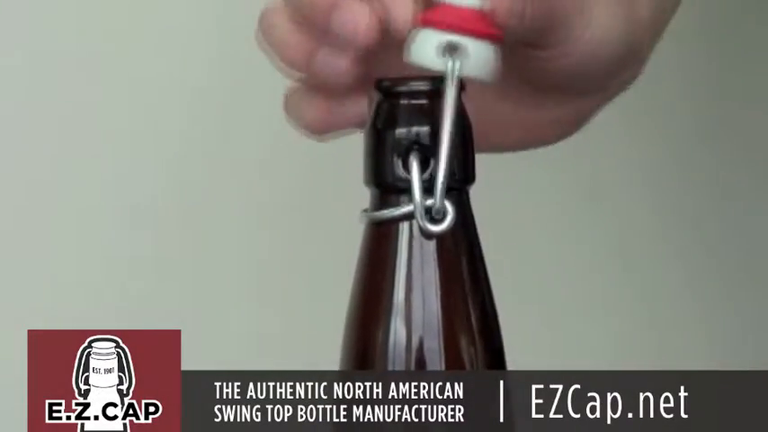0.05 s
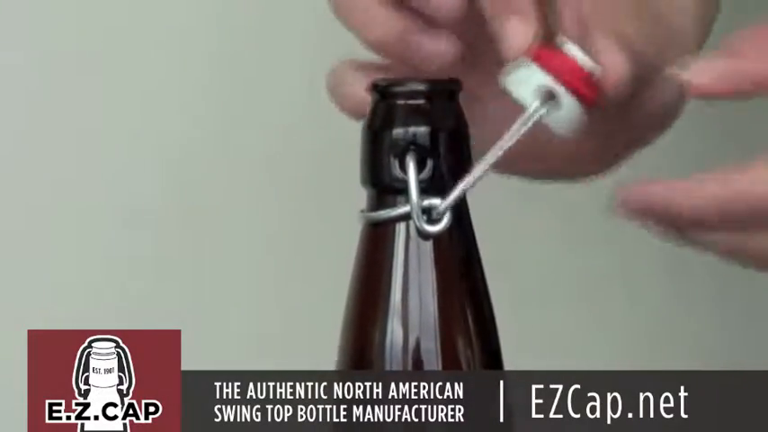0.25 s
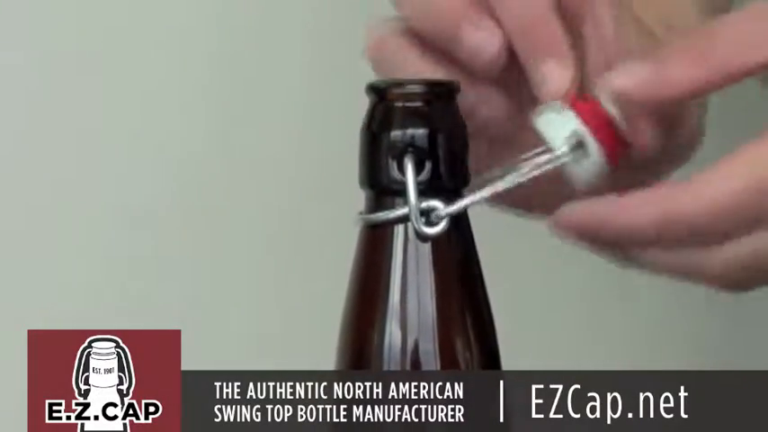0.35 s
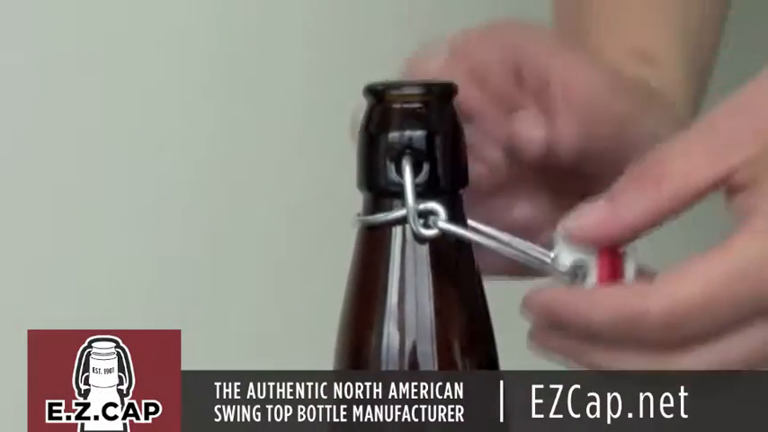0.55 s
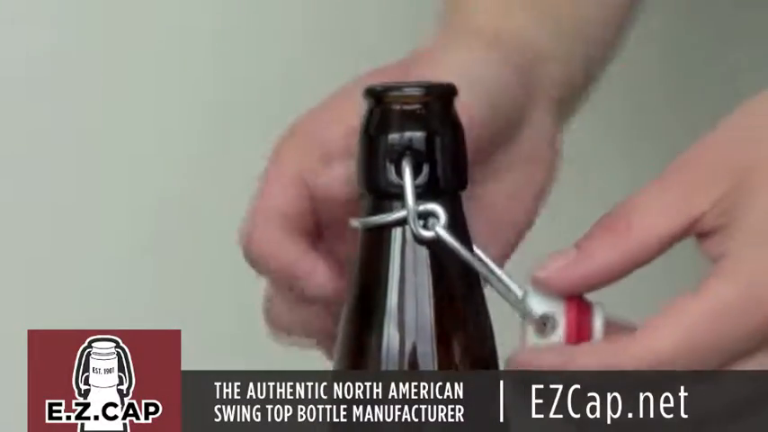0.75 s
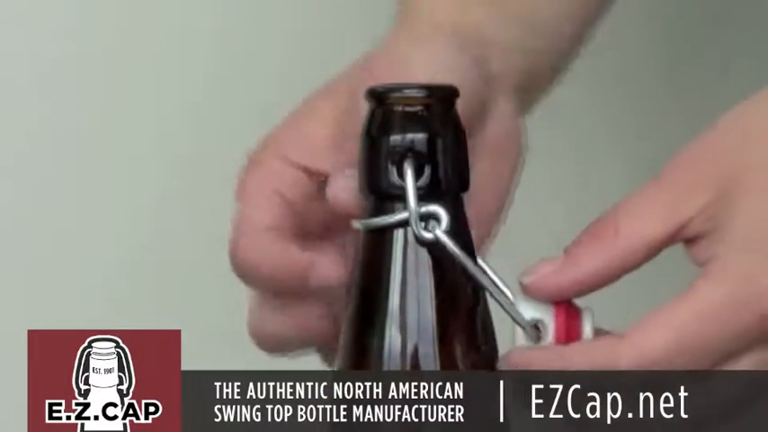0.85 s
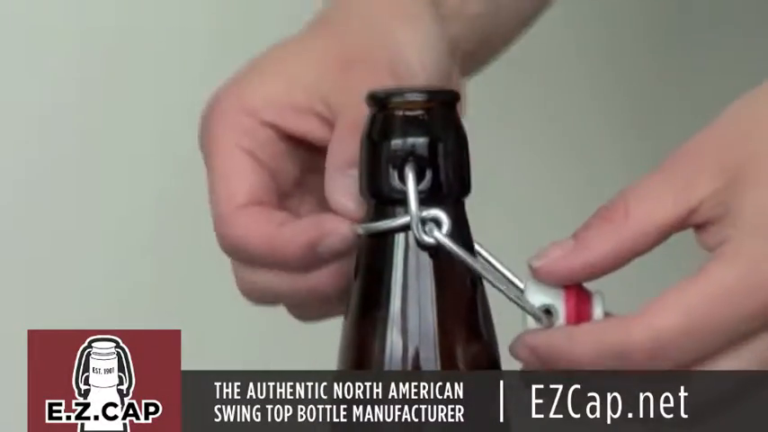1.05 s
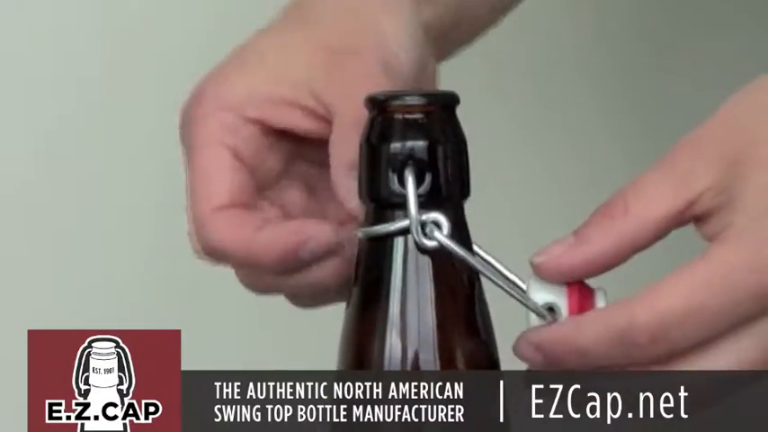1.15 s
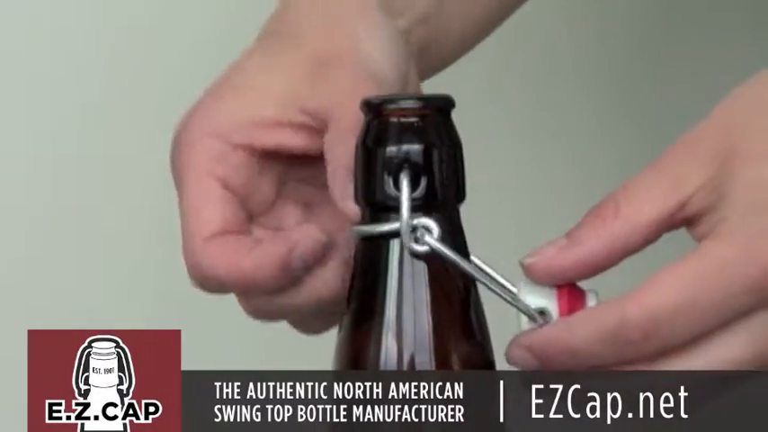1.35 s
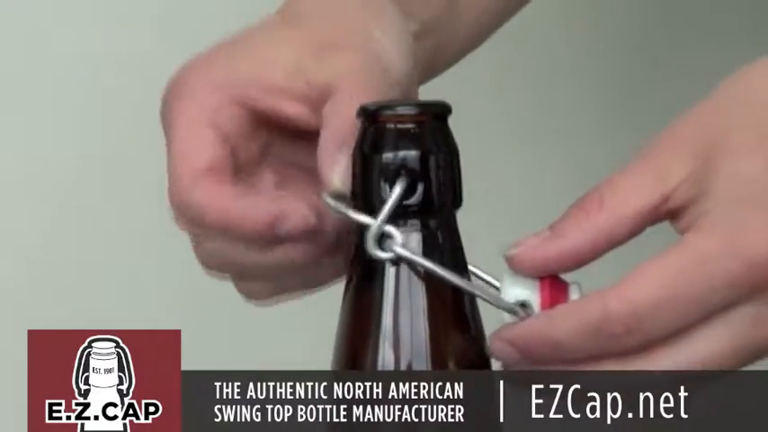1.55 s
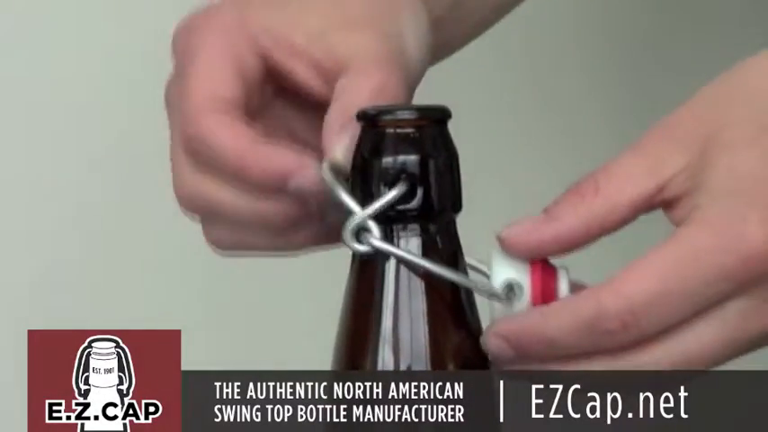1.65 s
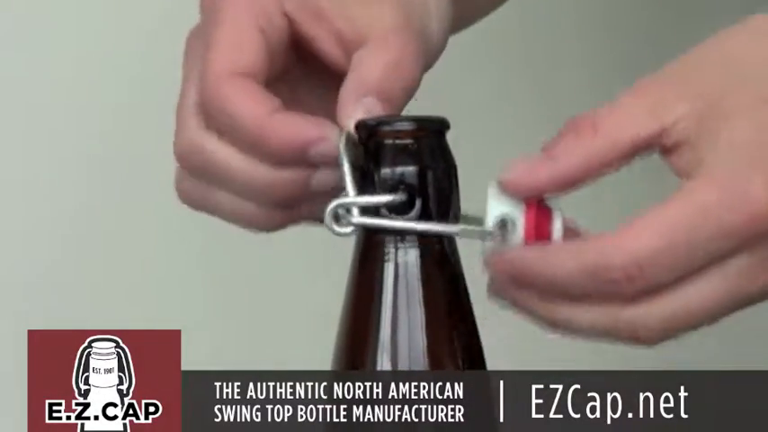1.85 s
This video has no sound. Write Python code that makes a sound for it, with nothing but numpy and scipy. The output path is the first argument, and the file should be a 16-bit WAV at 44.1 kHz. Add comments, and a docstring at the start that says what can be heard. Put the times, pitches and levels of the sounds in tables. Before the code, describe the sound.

A wire clasp clinks against a glass bottle, close by, at the start and at 0.2 seconds. The loudest cluster of bright, briefly ringing clinks comes around 0.5 seconds, with loose wire jiggling until 0.8. Softer ticks follow from 1.0 to 1.2 seconds. Around 1.6 the lever ticks and scrapes briefly, fading by 1.8. A low rumble and faint electrical whine fill the small room throughout.

```python
"""Opening a bottle's wire clasp

Hands swing open the wire clasp and stopper of a glass bottle, close by in a small room with a low
rumble and a thin electrical whine. Each clink is a short chatter of contacts that excites the damped
modes of wire and glass. Between clinks the loose wire jiggles; at the end the lever scrapes in its seat."""
import sys
import numpy as np
from scipy import signal
from scipy.fft import rfft, irfft
from scipy.io import wavfile

SR = 44100
rng = np.random.default_rng(int(sys.argv[2]) if len(sys.argv) > 2 else 0)


def to_wav(sig):
    """Store sig (one row per channel, or 1-D mono) as 16-bit WAV at the path in sys.argv[1].

    Samples outside -1..1 are clipped; the rate is SR.
    """
    pcm = np.clip(np.atleast_2d(sig), -1, 1) * 32767
    pcm = np.round(pcm).astype(np.int16)
    wavfile.write(sys.argv[1], SR, pcm.T)  # frames by channels


N = 83790

# Spectra of background noise, contact crack and lever friction: frequency_hz, relative_db
RUMBLE_SPECTRUM = [(20, -29), (32, 2), (44, 0), (70, -4.5), (120, -4), (160, -7.5), (220, -5), (290, -6.5),
                   (400, -14.5), (700, -17), (1000, -24), (1700, -29.5), (4000, -32), (9000, -36),
                   (14000, -36), (16500, -55)]
CRACK_SPECTRUM = [(300, -10), (1000, -8), (1800, -22), (3300, -16), (6300, -14.5), (9500, -0.5),
                  (11500, -1), (13000, -7), (16000, -24)]
SCRAPE_SPECTRUM = [(500, -13), (1500, -7), (2600, -4), (3500, -2.5), (4500, 1), (6500, -1), (7800, 0),
                   (9500, -3), (11000, -18), (14000, -24)]
# Stereo width of background noise and reverberation, narrow in the bass and highest treble:
# frequency_hz, side_to_mid_db
SIDE_SPECTRUM = [(30, -40), (90, -31), (180, -20), (350, -11), (700, -3.5), (1400, 2.5), (4000, -2.5),
                 (8000, -3.5), (12000, -25)]
# Steady tones: pitch_hz, level_db
HUM_TONES = [(43.3, -58.5), (183, -60.5), (217, -62.5), (275, -60.5), (15734, -64)]
# Modes of clasp and bottle: pitch_hz, level_db, t60_s, family (rounded to 0-7)
BOTTLE_MODES = [(2375, -8, .04, 1), (2747, -3, 0.046, 1), (2960, -4, 0.27, 1), (3340, -15, 0.082, 1.5),
                (3483, -14.5, 0.12, 0), (3536, -11, 0.16, 1.5), (3674, -5, 0.074, 2.5),
                (4630, -21.5, 0.11, 2), (4820, -20, 0.18, 3), (5835, -1.5, 0.17, 3), (7630, -21, 0.11, 0),
                (7940, -1.5, .17, 4), (8154, -19, 0.072, 2.5), (8260, -1.5, .11, 0), (8317, -7, .11, 0),
                (8927, -1, 0.097, 5), (8940, -21, .04, 4), (9935, -14, 0.13, -0.5), (10854, 0, 0.097, 6),
                (10750, -16, .03, 6), (11340, -12, 0.066, 6), (11900, -25, 0.15, 6), (12470, 0, 0.052, 7)]
# Impacts: start_s, level_db, chatter_s, t60_ratio, crack_db, then family_db for families 1-7
# (near 3, 3.5, 5.8, 7.9, 8.9, 10.9, 12.5 kHz), set by the place of contact against family 0 (8.3 kHz)
CLINK_EVENTS = [ (.003, -37, 0.006, 0.52, -10.5, -21, -16, -39, -13, -22, -17, -40),
                (.2332, -37, .001, 0.33, 4.5, -17, -14, 1, -10, -8, 2, -18),
                (0.2361, -33, 0.0065, 0.68, -4, -11.5, -33, -4, -13, -13, -5, -22),
                (.4378, -36.5, 0.0027, 0.68, -11, -9.5, -6.5, -10, -7, -1.5, 4.5, -1),
                (.5238, -37, 0.0022, .8, 4, -11, -13, -13, -5, -18, 7, 11),
                (.5295, -25, 0.0034, 0.61, -9, -28, -1, -24, -8.5, -6, 1, -10),
                (.543, -28, 0.0073, 0.56, -8.5, -22, -17, -25, -8, -17, 2, -20),
                (.5495, -30.5, 0.0015, 0.35, -5, -14, -18, -36, -1, -17, 5.5, -26),
                (.607, -41.5, .004, 0.59, -16, -12, -1, -34, -0.5, -14, -21, -25),
                (.624, -41.5, 0.0064, 0.9, 0, -8, 5.5, -22, -15, 2, -13, -24),
                (.631, -39, 0.0042, 0.88, -5, -6.5, 1, -14, -9.5, 1, -5, -24),
                (.647, -49, .004, 1.64, -15, -2, 11.5, -6.5, -3, 2, 12.5, -13),
                (.659, -47, 0.004, 1.1, -16, -6, 9, -20, -6, -2, 6, -15),
                (.673, -37, 0.015, 0.41, -17, -7, 2.5, -24, -16, -12, -7, -20),
                (0.7512, -35.5, 0.0028, 0.83, -5.5, -15, 1, -24, 3.5, -5, 2, -17),
                (.9695, -51, 0.0011, 0.43, 0, -1.5, 6, -12, -7, -1, 8.5, -8),
                (.9795, -44.5, .003, 0.68, 1.5, -15, 0.5, -20, -18, 4, 3, -17),
                (.9875, -45.5, 0.0016, 0.73, -9, -11, 0.5, -11, -14, 7, -2, -2),
                (1.0457, -52, 0.0019, 0.72, -1, 1, 3, -12, 0, -3, 6.5, -9),
                (1.063, -48, 0.0024, 0.6, 2.5, -5, -21, -7.5, -3, -10, 5.5, -4),
                (1.191, -50, .002, 0.68, -6, -9, -1, -12, -9, -7, -2.5, -16),
                (1.222, -62.5, .005, 0.65, 2, 7, 6, 3, -4, 1, -4, -6),
                (1.5925, -50, 0.0018, 0.82, 0, -6, 6.5, -9, 0, 4, 13.5, -3),
                (1.689, -60, .002, 0.54, -9, -2.5, -11, -12, -5, -8, -4, -4),
                (1.7055, -54, .002, 0.46, -5, -5, -12, -9, -7, -11, -1, -6),
                (1.736, -61.5, 0.0026, 0.49, 2, -4, 2, -8, -5, -1, -1, -3.5)]
# Bursts of rattling: start_s, length_s, level_db, ping_db (family 3)
JIGGLE_EVENTS = [(.01, .04, -55.5, -12), (0.13, .03, -58, 2.5), (0.224, 0.0092, -50.5, -11),
                 (.28, .035, -57.5, 4.5), (.355, .035, -55.5, -2.5), (.485, .02, -55.5, -12),
                 (0.514, .008, -47.5, -12), (.57, .04, -47, -10), (.68, .025, -51.5, -6),
                 (0.788, .05, -55.5, -6)]
# Lever strokes: start_s, level_db, t60_s
SCRAPE_STROKES = [(1.6359, -43.5, 0.22), (1.684, -57.5, 0.073), (1.704, -54, 0.12), (1.734, -55, 0.22)]
# Weights of families 0-7 under light contact: level_db
LIGHT_TOUCH_DB = [-4, -5, 4.5, -8, -7.5, -11, -5, -16]

EVENT_TIME_S = np.arange(SR // 2) / SR
LEFT_RIGHT = np.array([[1], [-1]])


def gain(db):
    """Amplitude ratio of a level in decibels."""
    return 10 ** (np.asarray(db) / 20)


def unit_rms(x):
    """Normalisation to an rms of 1."""
    return x / (np.sqrt(np.mean(x ** 2)) + 1e-12)


def decay(t, t60_s):
    """Exponential damping: 60 dB in t60_s."""
    return np.exp(-np.log(1000) * t / max(t60_s, 1e-3))


def add(out, start_s, x):
    """Superposition of x on out from start_s."""
    i = int(start_s * SR)
    x = x[:max(len(out) - i, 0)]
    out[i:i + len(x)] += x


def colour(x, spectrum):
    """Spectral shaping by a curve interpolated in log frequency."""
    hz, db = np.array(spectrum).T
    bins_hz = np.maximum(np.fft.rfftfreq(len(x), 1 / SR), 1)
    curve_db = np.interp(np.log(bins_hz), np.log(hz), db)
    return irfft(rfft(x) * gain(curve_db), len(x))


def rumble(level_db=-46.5):
    """Broadband room noise, strongest in the bass; an uncorrelated side signal gives it width."""
    mid, side = (unit_rms(colour(rng.standard_normal(N), RUMBLE_SPECTRUM)) for _ in range(2))
    return gain(level_db) * (mid + LEFT_RIGHT * colour(side, SIDE_SPECTRUM))


def hum():
    """Steady sinusoids superpose as a low hum and a thin electrical whine."""
    t = np.arange(N) / SR
    return sum(gain(db) * np.sqrt(2) * np.sin(2 * np.pi * (hz * t + rng.random()))
               for hz, db in HUM_TONES)


def contacts(t, per_s):
    """A Poisson process of tiny impacts of random strength."""
    return (rng.random(len(t)) < per_s / SR) * rng.standard_normal(len(t))


def ring(force, family_db, t60_ratio=1, bloom_s=.0011, detune=.0005):
    """Modal resonance: each mode swells and decays; the fingers alter its damping and pitch."""
    out = np.zeros(len(force))
    bloom = np.exp(-1 / (bloom_s * SR))
    shifts = rng.standard_normal(len(BOTTLE_MODES))
    for (hz, db, t60_s, family), shift in zip(BOTTLE_MODES, shifts):
        radius = decay(1 / SR, t60_s * t60_ratio)
        angle = 2 * np.pi * hz * (1 + detune * shift) / SR
        ring_poles, bloom_poles = ([1, -2 * r * np.cos(angle), r * r] for r in (radius, bloom))
        mode = signal.lfilter([1], np.convolve(ring_poles, bloom_poles), force)
        mode /= np.sqrt(mode @ mode * (1 - radius ** 2) + 1e-18)  # energy of a decay from rms 1
        out += gain(db + family_db[round(family)]) * mode
    return out


def clinks(rebound_db=-5.5):
    """Impact excitation: wire strikes glass and rebounds, giving a bright crack and a ring."""
    out, t = np.zeros(N), EVENT_TIME_S
    for start_s, db, chatter_s, t60_ratio, crack_db, *family_db in CLINK_EVENTS:
        force = gain(rebound_db) * contacts(t, per_s=1600) * np.exp(-(t / chatter_s) ** 2)
        force[0] += 1  # first contact
        noise = unit_rms(colour(rng.standard_normal(len(t)), CRACK_SPECTRUM))
        crack = gain(crack_db) * noise * decay(t, t60_s=.063)
        ringing = ring(force, [0, *family_db], t60_ratio)
        add(out, start_s, gain(db) * (ringing + crack))
    return out


def jiggles():
    """Random excitation: light, dense touches of the loose wire sustain the modes."""
    out, t = np.zeros(N), EVENT_TIME_S
    for start_s, length_s, db, ping_db in JIGGLE_EVENTS:
        family_db = [*LIGHT_TOUCH_DB[:3], ping_db, *LIGHT_TOUCH_DB[4:]]
        force = contacts(t, per_s=1000) * (t < length_s)
        add(out, start_s, gain(db) * ring(force, family_db))
    return out


def scrapes(attack_s=.001, ring_db=-15):
    """Sliding friction: the lever slips in short gritty strokes that barely ring the clasp."""
    out, t = np.zeros(N), EVENT_TIME_S
    for start_s, db, t60_s in SCRAPE_STROKES:
        grit = unit_rms(contacts(t, per_s=16000))
        envelope = (1 - np.exp(-t / attack_s)) * decay(t, t60_s)
        rasp = unit_rms(colour(grit, SCRAPE_SPECTRUM)) * envelope
        ringing = gain(ring_db) * ring(grit * envelope, LIGHT_TOUCH_DB)
        add(out, start_s, gain(db) * (rasp + ringing))
    return out


def reflections(t60_s, level_db, delay_s=.002):
    """Diffuse reflection: the impulse response is decaying noise."""
    t = EVENT_TIME_S
    response = rng.standard_normal(len(t)) * decay(t, t60_s) * (t > delay_s)
    return gain(level_db) * response / np.linalg.norm(response)


def room(direct, left_bias_db=1.4):
    """Reverberation by convolution: early reflections from hands and table, then a faint tail."""
    responses = [reflections(t60_s=.047, level_db=-13.5) + reflections(t60_s=.42, level_db=-17)
                 for _ in range(2)]
    mid, side = (signal.fftconvolve(direct, response)[:N] for response in responses)
    stereo = direct + mid + LEFT_RIGHT * colour(side, SIDE_SPECTRUM)
    return stereo * gain(LEFT_RIGHT * left_bias_db / 2)


def scene():
    """Superposition of the steady background and the clasp in the room."""
    return rumble() + hum() + room(clinks() + jiggles() + scrapes())


def record(dry, cutoff_hz=16300):
    """An elliptic low-pass filter removes the highest treble."""
    return signal.sosfilt(signal.ellip(8, .2, 70, cutoff_hz, fs=SR, output="sos"), dry)


dry = scene()
out = record(dry)
to_wav(out)
```